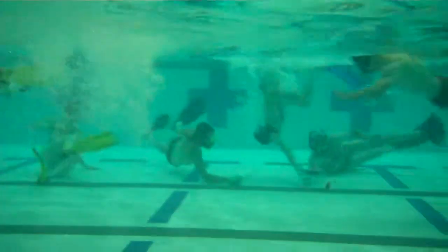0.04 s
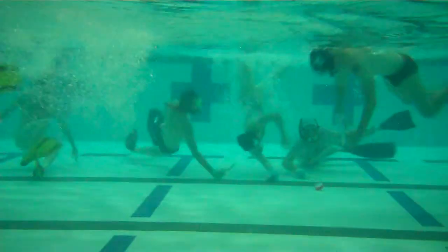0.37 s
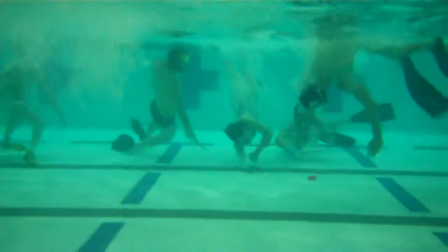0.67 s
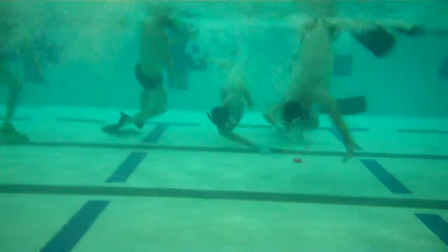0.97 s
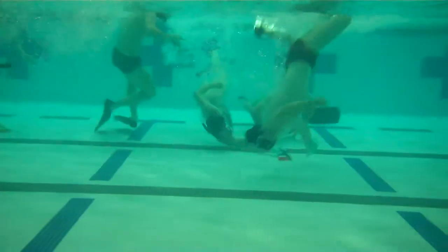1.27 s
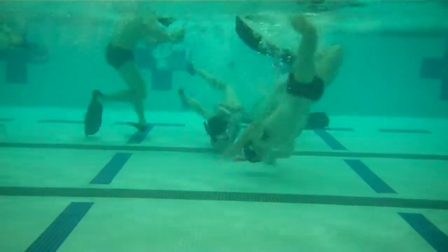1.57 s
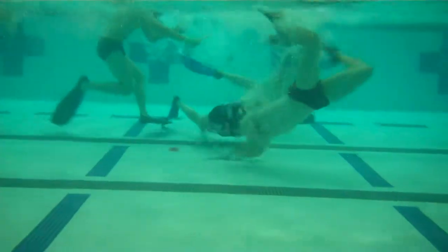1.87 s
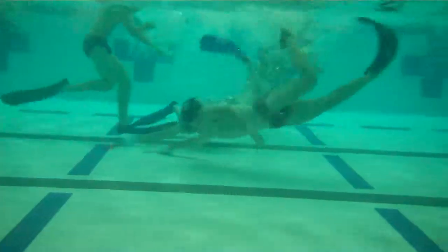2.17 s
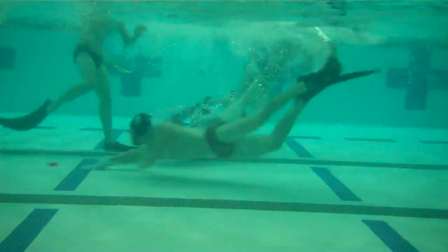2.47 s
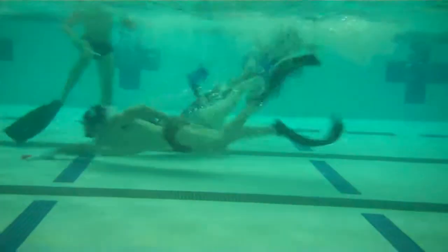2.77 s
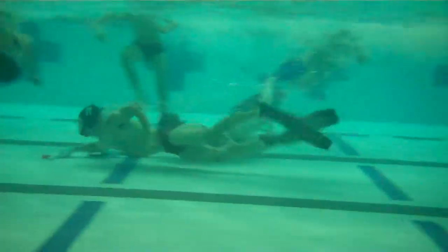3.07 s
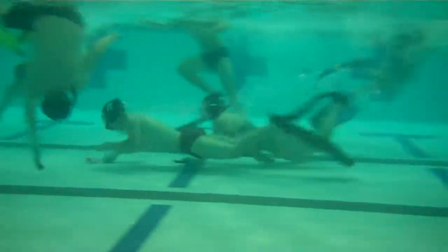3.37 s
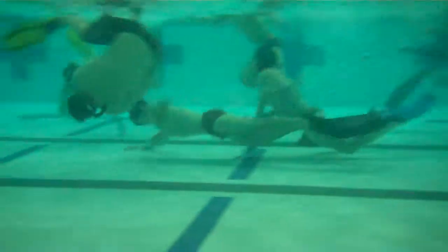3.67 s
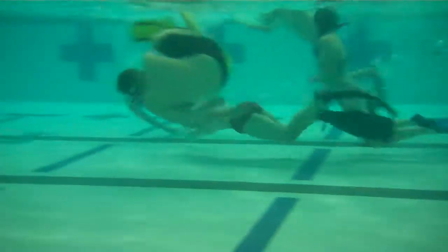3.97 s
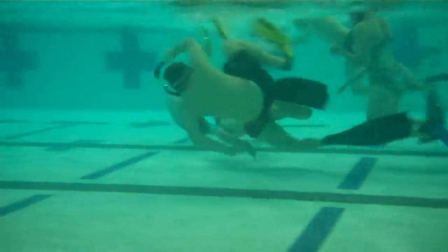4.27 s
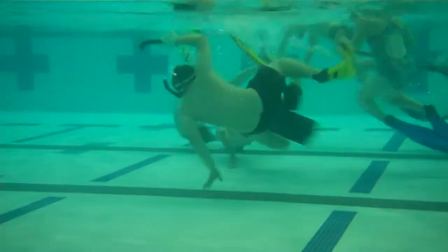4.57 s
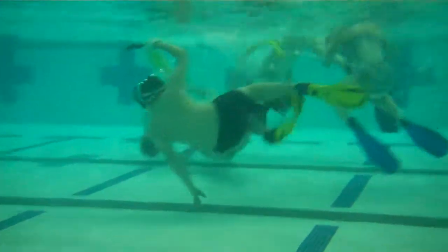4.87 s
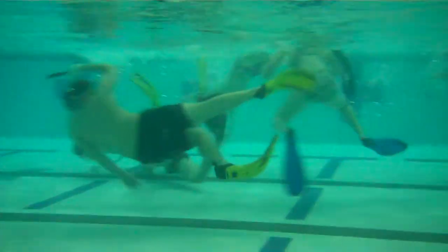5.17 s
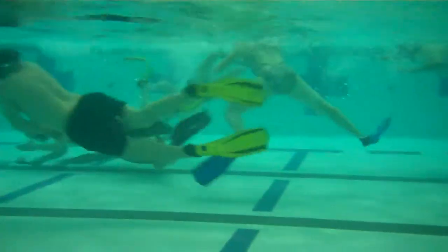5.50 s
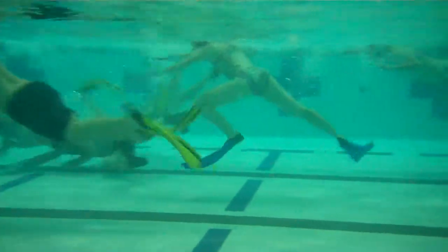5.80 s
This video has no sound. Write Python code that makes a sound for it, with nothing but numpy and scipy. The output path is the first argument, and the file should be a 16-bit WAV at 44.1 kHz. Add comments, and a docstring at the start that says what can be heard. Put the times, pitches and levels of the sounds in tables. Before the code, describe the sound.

Muffled underwater churning and fizzing bubbles in a pool, with sharp clicks, hard knocks and a close, deep gurgle past halfway.

```python
"""Swimmers with fins chase a puck over a pool floor, heard under water on the two microphones of a
camera in a watertight housing. All round, kicks hum and churned water fizzes with small bubbles.
Hard blows close by and lighter clicks arrive smeared by floor and surface. Past halfway, a gush of
large bubbles gurgles up right by the camera. The walls of the housing colour the sound."""
import sys
import numpy as np
from scipy import signal
from scipy.fft import rfft, irfft, next_fast_len
from scipy.io import wavfile
from scipy.ndimage import uniform_filter1d

SR = 44100
rng = np.random.default_rng(int(sys.argv[2]) if len(sys.argv) > 2 else 0)


def waveform_to_disk(signal):
    """Save audio, clipped to [-1, 1], as 16-bit WAV at the path in sys.argv[1]."""
    frames = np.transpose(np.atleast_2d(signal))
    scaled = np.clip(frames, -1, 1) * 32767
    samples = np.round(scaled).astype(np.int16)
    wavfile.write(sys.argv[1], SR, samples)


N = 261954
TIME = np.arange(N) / SR
FFT_SIZE = next_fast_len(N + SR // 2, True)
FREQ = np.maximum(np.arange(FFT_SIZE // 2 + 1) * SR / FFT_SIZE, 1)
LEFT_RIGHT = np.array([[1], [-1]])
FORERUNNER_S = .003  # sound through the floor arrives this much early


def undb(db):
    """Decibels to gain."""
    return 10 ** (np.asarray(db) / 20)


def unit(x):
    """Scale to rms 1."""
    return x / np.sqrt(np.mean(x ** 2) + 1e-20)


def fade(t, t60):
    """Exponential decay that starts at t = 0."""
    return (t >= 0) * np.exp(-np.log(1000) * np.maximum(t, 0) / t60)


def add(out, s, x):
    """Mix x into out from time s."""
    i = max(int(s * SR), 0)
    part = out[..., i:i + x.shape[-1]]
    part += x[..., :part.shape[-1]]


def band(x, lo_hz, hi_hz, order=4):
    """Causal band-pass."""
    sos = signal.butter(order, [lo_hz, min(hi_hz, .45 * SR)], "band", fs=SR, output="sos")
    return signal.sosfilt(sos, x)


def across(points):
    """Join (frequency [Hz], value) points on a log-frequency axis."""
    hz, value = np.transpose(points)
    return np.interp(np.log(FREQ), np.log(hz), value)


def shape(x, gain):
    """Filter by a gain for each frequency."""
    return irfft(rfft(x, FFT_SIZE) * gain, FFT_SIZE)[..., :N]


def even(x, span_s):
    """Keep the quick throbs of a cloud and level its slow swells."""
    return x / np.sqrt(uniform_filter1d(np.mean(x ** 2, axis=0), int(span_s * SR)) + 1e-9)


def loudness(x, db):
    """Give a short sound the energy of a fiftieth of a second at this level."""
    return x * undb(db) / np.sqrt(np.sum(x ** 2) / (2 * SR / 50))


def minimum_phase(gain):
    """Turn a gain curve into a response that rings only after the blow."""
    cepstrum = irfft(np.log(gain), FFT_SIZE)
    fold = np.where(np.arange(FFT_SIZE) < FFT_SIZE // 2, 2, 0)
    fold[0] = 1
    return np.exp(rfft(cepstrum * fold))


# How far the left microphone leads the right: (frequency [Hz], phase [rad])
MIC_LEAD = [(250, 0.078), (600, 0.048), (1400, -0.063), (2300, 0.88), (3200, -0.31), (9000, -1.68)]


def resonances(modes, valley_db):
    """Response of a set of modes at the two microphones, with a flat floor between the peaks."""
    power = undb(2 * valley_db)
    for hz, width, left_db, right_db in modes:
        detuning = (FREQ - hz) / (0.51 * width)
        power = power + undb([[2 * left_db], [2 * right_db]]) / (1 + detuning ** 2) ** 2
    return minimum_phase(np.sqrt(power)) * np.exp(.5j * across(MIC_LEAD) * LEFT_RIGHT)


# Wall modes around the microphones: (frequency [Hz], width [Hz], left level [dB], right level [dB])
HOUSING_MODES = [(250, 140, -2, -3.5), (548, 93, -2, -1), (670, 110, -4, -40), (825, 81, -57, 1),
                 (861, 120, -4.5, -1), (1300, 520, -9, -7.5), (1399, 38, -3.5, 1), (1570, 310, -11.5, -40),
                 (1749, 305, -4.5, -0.5), (2160, 350, -8, -6.5), (2421, 314, 0, -13),
                 (2914, 140, -1.5, -30), (3504, 1260, -5, -10), (3975, 120, -9, -3), (4960, 720, -41, -7),
                 (5414, 340, -5, -37), (6530, 690, -7.5, -6.5), (6880, 280, -7, -38),
                 (7906, 660, -2.5, -14), (8670, 5400, -13, -19), (11650, 10000, -65, -68)]


def housing():
    """The walls of the housing pass sound from the water best at their resonances."""
    return resonances(HOUSING_MODES, valley_db=-40)


def bubble(hz, t60, glide, onset_cycles=0.68):
    """A bubble rings like a spring, and its pitch climbs as it rises."""
    t = np.arange(int(t60 * SR) + 2) / SR
    phase = 2 * np.pi * hz * t * (1 + glide * t / t60 / 2)
    return np.sin(phase) * fade(t, t60) * (1 - np.exp(-t * hz / onset_cycles))


def swarm(lo_hz, hi_hz, cycles, scatter_db, spread, count):
    """Bubbles of random size, time and place, each ringing for about this many cycles."""
    out = np.zeros((2, N))
    for when, pitch, rank, life, side in rng.random((count, 5)):
        hz = lo_hz * (hi_hz / lo_hz) ** pitch
        gain = undb(-scatter_db * np.log(rank + 0.067)) * hz / hi_hz
        pan = 1 + spread * (2 * side - 1) * LEFT_RIGHT
        add(out, when * N / SR, gain * pan * bubble(hz, cycles * (.5 + life) / hz, glide=0.22))
    return unit(out)


# Hum from far across the pool, as heard in the housing: (frequency [Hz], level [dB])
WASH_SPECTRUM = [(13, -58), (22, -24), (65, -19.5), (124, -18), (144, -10), (184, -14.5), (268, -1.5),
                 (282, -1), (308, -9.5), (428, -24), (450, -22), (580, -74), (990, -120)]


def distant_wash(level_db=-51, stereo_width=0.17, blub_db=-4):
    """Distant kicks and soft blubs keep the lowest resonance of the housing humming."""
    colour = undb(across(WASH_SPECTRUM))
    noise = rng.standard_normal((3, N))
    blubs = swarm(174, 455, cycles=16, scatter_db=-0.5, spread=.1, count=120)
    hum = shape(noise[0] + stereo_width * noise[1:], colour)
    water = unit(hum) + undb(blub_db) * unit(shape(blubs, colour))
    return even(water, span_s=0.39) * undb(level_db)


# Diffuse hiss from all round the pool: (frequency [Hz], level [dB])
HISS_SPECTRUM = [(400, 7.5), (1000, -9.5), (2000, -0.5), (3500, -3), (6000, -5.5), (9000, -26),
                 (14000, -15)]
# Borders of the slosh, bubbling and fizz bands: (frequency [Hz])
WATER_BAND_EDGES = [430, 1100, 3000, 15000]
# Low sloshing around the camera: (time [s], level [dB])
SLOSH_LEVELS = [(0, -50), (0.55, -56), (0.92, -50.5), (1.3, -55), (1.8, -59.5), (2.25, -55), (2.85, -49.5),
                (3.3, -50), (3.53, -44.5), (3.72, -52.5), (4.05, -51.5), (4.4, -65.5), (5.6, -57.5),
                (5.74, -50), (5.94, -58)]
# How hard the fins churn the water, near and far: (time [s], level [dB])
FIN_EFFORT = [(0.0, -48), (0.13, -50.5), (0.46, -53), (0.68, -51.5), (0.96, -50), (1.32, -51.5),
              (1.52, -51), (1.74, -49), (2.15, -48), (2.46, -45), (3.19, -48), (3.97, -51), (4.32, -47),
              (4.48, -48.5), (5.84, -52), (5.94, -49.5)]


def fin_churn(walls, bubbling_db=-3, fizz_db=-3, hiss_db=-8, near_db=-9, throb_db=1.28, throb_hz=9):
    """Fins beat air into the water in uneven throbs: near bubbles in the blur of countless far ones."""
    far = rng.standard_normal((4, N))
    near = swarm(430, 7000, cycles=20, scatter_db=3, spread=.6, count=5000) * undb(near_db)
    water = unit(shape(near + unit(far[0] + far[1:3]), walls))
    # echoes from all round fill the gaps between the resonances
    water = water + undb(hiss_db) * unit(shape(far[3], undb(across(HISS_SPECTRUM))))
    slosh = np.interp(TIME, *np.transpose(SLOSH_LEVELS))
    effort = np.interp(TIME, *np.transpose(FIN_EFFORT))
    throb = throb_db * unit(shape(rng.standard_normal(N), 1 / (1 + (FREQ / throb_hz) ** 4)))
    bands = zip(WATER_BAND_EDGES, WATER_BAND_EDGES[1:], (slosh, effort + bubbling_db, effort + fizz_db))
    return sum(unit(band(water, lo, hi)) * undb(db + throb) for lo, hi, db in bands)


def stray_pops(walls, level_db=-57, echo_db=-4, echo_t60=0.066):
    """Stray bubbles pop here and there with a short echo, louder when the fins work harder."""
    pops = swarm(800, 4500, cycles=20, scatter_db=2.5, spread=.6, count=350)
    t = np.arange(SR // 10) / SR
    echo = rng.standard_normal(len(t)) * fade(t, echo_t60)
    pops = pops + undb(echo_db) * unit(signal.fftconvolve(pops, echo[None], axes=1)[:, :N])
    stirring = undb(np.interp(TIME, *np.transpose(FIN_EFFORT)))
    return unit(shape(pops, np.sqrt(np.abs(walls))) * stirring) * undb(level_db)


def shallow_water(response, lag_s=0.002836, corner_hz=800):
    """Impulse response after shallow water, which carries the low notes more slowly."""
    dispersion = np.exp(-2j * np.pi * lag_s * corner_hz * np.arctan(FREQ / corner_hz))
    return np.roll(irfft(response * dispersion, FFT_SIZE), 16, axis=1)[:, :SR // 20]


def burst_paths(t60, tail_db, tail_t60, rebound_s, rebound_db, forerunner_db=-15, stereo_width=0.87):
    """A burst by many paths: a forerunner through the floor, direct sound, a rebound, the pool's tail."""
    t = np.arange(SR // 5) / SR - FORERUNNER_S
    forerunner = undb(forerunner_db) * (t < 0) * (1 + t / FORERUNNER_S)
    rebound = undb(rebound_db) * fade(t - rebound_s, 0.03)
    tail = undb(tail_db) * fade(t, tail_t60)
    envelope = uniform_filter1d(forerunner + fade(t, t60) + rebound + tail, size=40)
    noise = rng.standard_normal((3, len(t)))
    spectrum = rfft((noise[0] + stereo_width * noise[1:]) * envelope)
    # a sharp onset feeds all frequencies alike
    return irfft(spectrum / np.sqrt(uniform_filter1d(np.abs(spectrum) ** 2, size=90, axis=1)), len(t))


# The ring of each blow at the microphones:
# (frequency [Hz], width [Hz], left level [dB], right level [dB])
HOLLOW_MODES = [(254, 30, -23, -22), (573, 64, -0.5, 0), (830, 63, -3, 2.5), (1366, 120, 1, -2.5),
                (1845, 52, -6, -1), (2250, 240, -1.5, -6), (2720, 100, -3.5, -26), (3450, 560, -5, -5),
                (3840, 210, -1.5, -10), (4750, 200, -8, -5), (6330, 720, -5.5, -5), (7800, 920, -6, -16),
                (10400, 6000, -21.5, -33)]
WOODY_MODES = [(464, 170, -13, -11.5), (900, 160, -17, -7), (1140, 84, -3, 1), (1660, 440, -11, -10),
               (1970, 470, -35, -6), (2160, 760, -4.5, -35), (3490, 610, -8.5, -13), (4180, 95, -8, -11.5),
               (4880, 130, -35, -3), (5450, 460, -5, -15), (6630, 580, -5, -7), (7600, 2300, -10.5, -22),
               (10600, 2300, -20.5, -37)]
BRIGHT_MODES = [(340, 70, -13, -13), (483, 70, -14.5, -13), (872, 61, -15, -6), (1300, 180, -14, -11.5),
                (1730, 150, -13, -10), (2110, 85, -7, -8), (2760, 640, -5, -13), (3670, 700, -4, -37),
                (3820, 640, -38, -5.5), (5200, 1050, -12, -7), (6470, 330, -5.5, -11),
                (7500, 1100, -6, -15), (9400, 4300, -19.5, -35)]
# Stick on puck, close by on the pool floor: (time [s], level [dB], contact t60 [s], tail level [dB],
# tail t60 [s], rebound delay [s], rebound level [dB])
PUCK_BLOWS = [(0.0431, -12.5, 0.011, -21.5, 0.1, 0.0064, -40),
              (4.8705, -15.5, 0.0037, -16.5, 0.14, 0.0064, -15),
              (5.7939, -13.5, 0.0073, -17.5, 0.14, 0.0095, -16)]


def puck_blows():
    """Three hard blows of stick and puck close by; each sets other modes ringing."""
    out = np.zeros((2, N))
    for (s, db, *decay), modes in zip(PUCK_BLOWS, (HOLLOW_MODES, WOODY_MODES, BRIGHT_MODES)):
        # water damps every mode quickly, which widens it
        damped = [(hz, max(width, 75 + .045 * hz), left, right) for hz, width, left, right in modes]
        ring = shallow_water(resonances(damped, valley_db=-42))
        blow = signal.fftconvolve(burst_paths(*decay), ring, axes=1)
        add(out, s - FORERUNNER_S, loudness(blow, db))
    return out


# Short pitched rings close to the microphones: (time [s], pitch [Hz], level [dB])
NEAR_RINGS = [(0.098, 780, -33), (0.202, 912, -34.5), (0.247, 542, -31.5), (0.4996, 560, -33),
              (1.1057, 3630, -20), (1.4712, 766, -28.5), (1.5145, 2410, -27), (1.5347, 3430, -26.5),
              (1.572, 360, -35), (1.945, 3800, -19), (1.9664, 3250, -17), (2.032, 242, -31),
              (2.182, 546, -31.5), (2.223, 1387, -22), (2.361, 822, -25.5), (2.449, 2500, -23),
              (2.656, 1330, -22.5), (2.668, 1560, -31), (2.68, 1900, -32), (2.787, 2290, -26.5),
              (2.958, 2040, -30.5), (3.6632, 857, -22.5), (3.676, 977, -26.5), (3.956, 1412, -23.5),
              (4.719, 301, -22), (4.804, 395, -26), (5.3, 3490, -28), (5.338, 4380, -25),
              (5.4147, 2480, -30)]


def plops_and_rings(walls, gain_db=-2, longest_t60=0.066, knee_hz=2180, echo_db=-9, echo_t60=0.13):
    """Plops of single bubbles and the bright ring of sharp clicks, blurred by echoes."""
    out, t = np.zeros((2, N)), np.arange(SR // 10) / SR
    for s, hz, db in NEAR_RINGS:
        paths = rng.standard_normal((2, len(t))) * fade(t, echo_t60)
        paths *= undb(echo_db) / np.sqrt(np.sum(paths ** 2) / 2)
        paths[:, 0] += 1  # the direct sound
        t60 = longest_t60 / (1 + (hz / knee_hz) ** 2)  # high rings die sooner
        tone = signal.fftconvolve(bubble(hz, t60, glide=0.036)[None], paths, axes=1)
        pan = unit(np.abs(walls[:, [np.searchsorted(FREQ, hz)]]))  # the housing steers each pitch
        add(out, s, tone * pan * undb(gain_db + db))
    return out


# Fin strokes around the camera: (crest time [s], half length [s], pitch [Hz], level [dB])
FIN_STROKES = [(0.114, 0.01, 800, -46.5), (0.25, 0.019, 710, -57.5), (0.81, 0.034, 2530, -49),
               (0.863, 0.04, 1000, -56), (1.108, 0.025, 3230, -44.5), (1.632, 0.025, 1900, -40.5),
               (1.731, 0.031, 1690, -43.5), (1.9, 0.052, 2480, -39.5), (2.498, 0.024, 2430, -37.5),
               (2.672, 0.0096, 1570, -38), (2.705, 0.11, 1300, -62), (2.89, 0.035, 6900, -54),
               (2.966, 0.019, 2270, -38.5), (4.12, 0.022, 1700, -40.5), (4.34, 0.1, 3000, -49.5),
               (4.771, 0.0043, 2780, -37.5), (5.175, 0.016, 2370, -46)]


def fin_strokes(walls, blur_db=-4, width_hz=1240):
    """Each fin stroke sheds a short rush of like-sized bubbles."""
    cloud = swarm(830, 4100, cycles=16.6, scatter_db=0, spread=1.0, count=4500)
    cloud = shape(cloud + undb(blur_db) * rng.standard_normal(N), walls)
    out = np.zeros((2, N))
    for crest, half, hz, db in FIN_STROKES:
        rush = unit(shape(cloud, 1 / (1 + (2 * (FREQ - hz) / width_hz) ** 2)))
        out += rush * undb(db) * np.exp(-((TIME - crest) / half) ** 2 / 2)
    return out


# Light knocks, clicks, narrow bubble pings and a short bubbly burst, near and far:
# (time [s], level [dB], centre [Hz], width [octaves], tail level [dB])
KNOCKS_AND_PINGS = [(0.6744, -45, 503, 1.5, 0), (0.6924, -47, 510, 1.3, -30),
                    (0.806, -47.5, 2370, 4.5, -27), (0.8254, -44.5, 2960, 4.1, -13),
                    (0.844, -41.0, 497, 1.6, 0), (0.9474, -42, 7100, 1.3, -22),
                    (0.9616, -29.5, 5460, 1.5, -26), (1.0564, -39.5, 3270, 1.4, -2),
                    (1.1061, -37, 6340, 2, -40), (1.1154, -39.5, 4570, 0.61, -26),
                    (1.334, -48, 3850, 0.51, -22), (1.4709, -36.5, 800, 1.8, -40),
                    (1.5147, -41.0, 2030, 2, -15), (1.6194, -47, 2550, 1.5, -18),
                    (1.6344, -35, 4000, 1.5, -15), (1.9004, -42.5, 2370, 4.8, -4),
                    (1.9457, -36.0, 4300, 0.61, -45), (1.9664, -30, 4300, 1.05, -38),
                    (2.0674, -39.5, 4650, 0.56, -27), (2.2241, -33, 1800, 1.16, -28),
                    (2.4149, -34.5, 4540, 5.9, -16), (2.4264, -36, 5160, 0.97, -28),
                    (2.485, -38, 2930, 5.7, 0), (2.5804, -37.5, 6260, 1.1, -25),
                    (2.6574, -30.5, 1980, 1.5, 0), (2.6684, -33.5, 2400, 4.7, 4),
                    (2.6864, -38.5, 2980, 4.1, -16), (3.6638, -31.5, 540, 5.2, -29),
                    (3.9442, -36, 840, 9, -2), (4.1864, -38, 716, 1.3, -24), (4.22, -38, 5360, 1.4, -23),
                    (4.2472, -26, 5100, 1.95, -17.5), (5.1894, -46.5, 2590, 0.89, -35),
                    (5.2442, -39.5, 1900, 0.6, -35), (5.3004, -45, 3170, 0.48, -26),
                    (5.3768, -48.0, 1630, 2.3, -29), (5.4151, -39, 1920, 1.15, -29),
                    (5.5624, -40, 2070, 1, -6), (5.6658, -47, 9030, 3.3, -40)]


def knocks_and_pings(walls, gain_db=-0.2, edge_hz=10000):
    """Knocks, clicks, bubble pings and a bubbly burst each ring their own band of the housing modes."""
    out, ring = np.zeros((2, N)), shallow_water(walls)
    highpass = signal.butter(2, edge_hz, "high", fs=SR, output="sos")
    for s, db, hz, octaves, tail_db in KNOCKS_AND_PINGS:
        direct_t60 = 0.0094 * (3000 / hz) ** 0.24  # brighter sounds are shorter
        paths = burst_paths(direct_t60, tail_db, tail_t60=0.12, rebound_s=0.0086, rebound_db=-19,
                            forerunner_db=-17, stereo_width=0.58)
        reach = 2 ** (octaves / 2)
        burst = band(signal.fftconvolve(paths, ring, axes=1), hz / reach, hz * reach, order=1)
        # the nearer a sound, the less pool tail it has and the more of its sharp edge is left
        edge_db = -9 - 0.5 * min(tail_db, -20)
        burst = burst + (undb(edge_db) - 1) * signal.sosfiltfilt(highpass, burst)
        add(out, s - FORERUNNER_S, loudness(burst, gain_db + db))
    return out


def gush_envelope(start, attack, hold, t60):
    """A rush of air or water opens, holds and dies away."""
    opening = np.clip((TIME - start) / attack, 0, 1)
    return opening * fade(np.maximum(TIME - start - attack - hold, 0), t60)


# Large bubbles in turbulent water, as heard in the housing: (frequency [Hz], level [dB])
GURGLE_SPECTRUM = [(18, -80), (30, -44), (69, -26), (97, -20), (125, -19), (178, -19), (264, 0.5),
                   (297, -6.5), (357, -8.5), (441, -19), (504, -25.5), (655, -28.5), (700, -27), (910, -62),
                   (1540, -120)]
# Gushes close to the camera: (time [s], attack [s], hold [s], release t60 [s], level [dB])
NEAR_GUSHES = [(3.017, 0.02, 0.2, 0.33, -49.5), (3.323, 0.014, 0.26, 3.03, -29),
               (4.713, 0.014, 0.12, 0.2, -44), (4.94, 0.032, 0.36, 1.4, -44.5),
               (5.622, 0.095, 0.095, 1, -34.5)]


def gurgle(gain_db=-1, flow_db=-3):
    """With each gush a cloud of large bubbles rises in turbulent water."""
    cloud = swarm(142.6, 652, cycles=17.8, scatter_db=3.0, spread=0.21, count=1500)
    flow = unit(band(rng.standard_normal(N), 38, 634))
    water = shape(cloud + undb(flow_db) * flow, undb(across(GURGLE_SPECTRUM)))
    envelope = sum(undb(gain_db + db) * gush_envelope(*timing) for *timing, db in NEAR_GUSHES)
    return even(water, span_s=0.039) * envelope


# Large pockets of air right by the housing: (crest time [s], level [dB], swell time [s])
AIR_POCKETS = [(3.326, -22, 0.0031), (3.359, -11.5, 0.0052), (3.393, -17.5, 0.0042), (3.407, -21, 0.004),
               (3.479, -20, 0.0016), (3.496, -20, 0.01), (3.545, -18, 0.0059), (3.575, -24.5, 0.0045),
               (3.651, -23, 0.004), (3.725, -24.5, 0.0051)]


def glugs(pitch_hz=268.2, decay_ratio=0.73, surge_db=-38, rumble_db=-3, gush_db=-4):
    """Air pockets swell and break off, shoving water aside with a rumble and a gush of smaller bubbles."""
    rumble = even(band(rng.standard_normal((1, N)), 99, 250), span_s=0.026)
    gush = even(swarm(319, 627, cycles=15, scatter_db=4, spread=0.16, count=900), span_s=0.026)
    surge = undb(surge_db) * gush_envelope(start=3.32, attack=0.043, hold=0.18, t60=0.12)
    out = (rumble * undb(rumble_db) + gush * undb(gush_db)) * surge
    t = np.arange(-SR // 20, SR // 10) / SR
    for crest, db, swell in AIR_POCKETS:
        envelope = 1 / np.cosh(t / np.where(t < 0, swell, swell * decay_ratio))
        add(out, crest + t[0], undb(db) * envelope * np.sin(2 * np.pi * pitch_hz * (crest + t)))
    return out


def scene():
    """The game and the stirred water at the two microphones in the housing."""
    walls = housing()
    short_sounds = puck_blows() + knocks_and_pings(walls) + plops_and_rings(walls)
    small_bubbles = fin_churn(walls) + fin_strokes(walls) + stray_pops(walls)
    return short_sounds + small_bubbles + distant_wash() + gurgle() + glugs()


def record(dry, top_hz=14350):
    """The camera clips at full scale and cuts the top of the treble."""
    lowpass = signal.ellip(8, .2, 70, top_hz, fs=SR, output="sos")
    return signal.sosfilt(lowpass, np.clip(dry, -1, 1))


dry = scene()
out = record(dry)
waveform_to_disk(out)
```